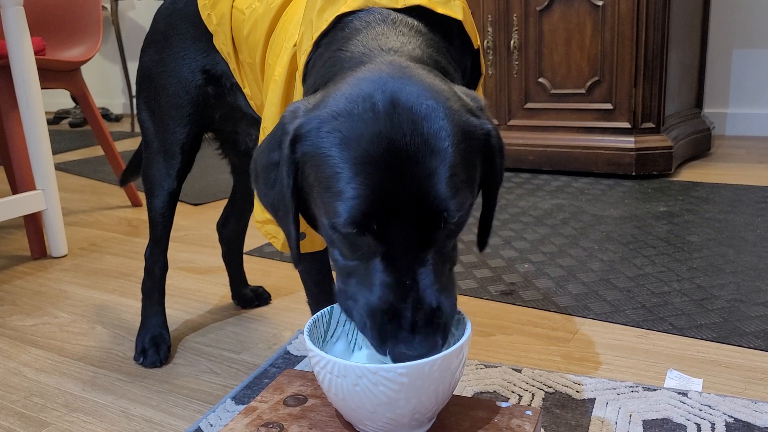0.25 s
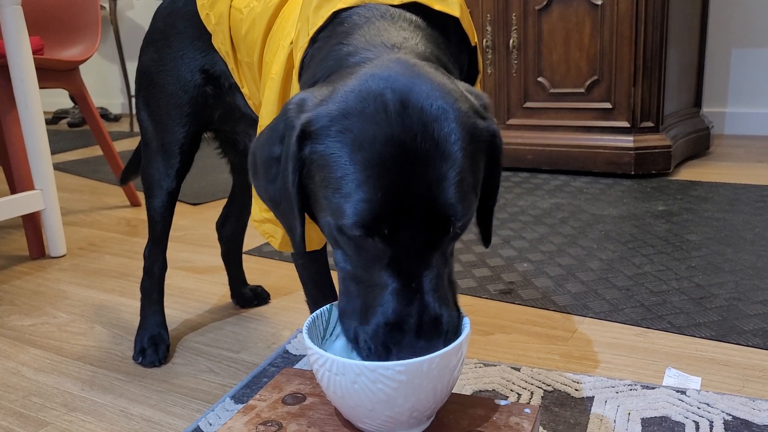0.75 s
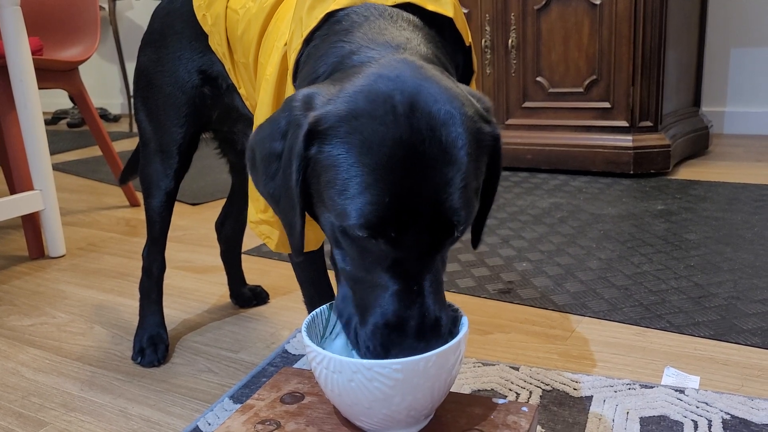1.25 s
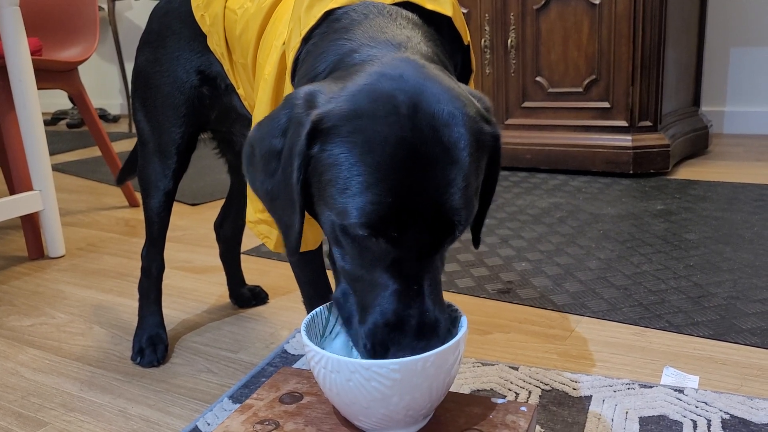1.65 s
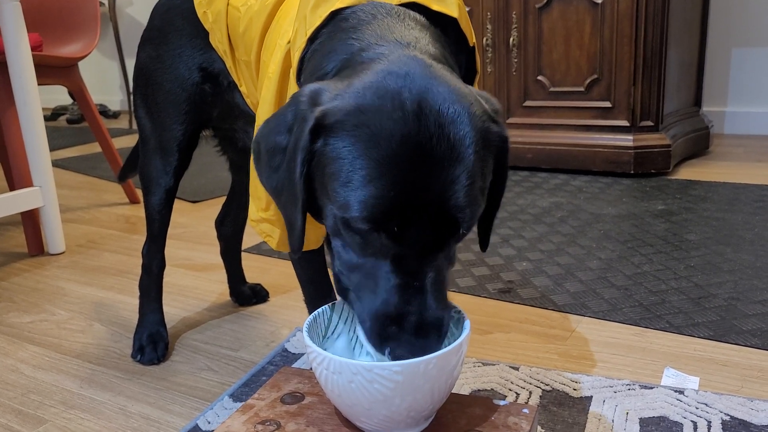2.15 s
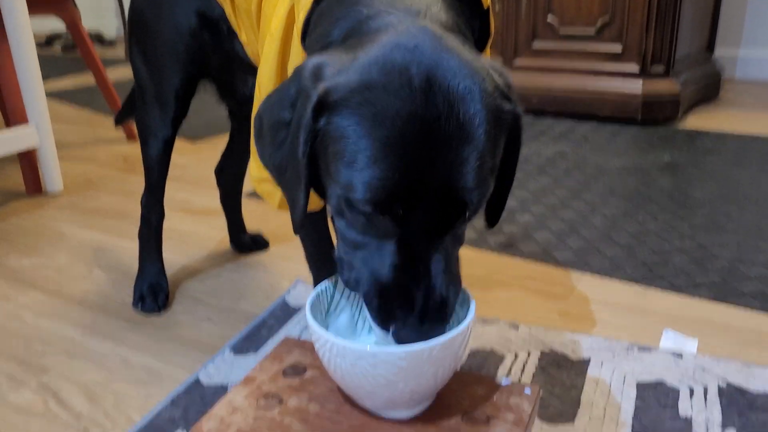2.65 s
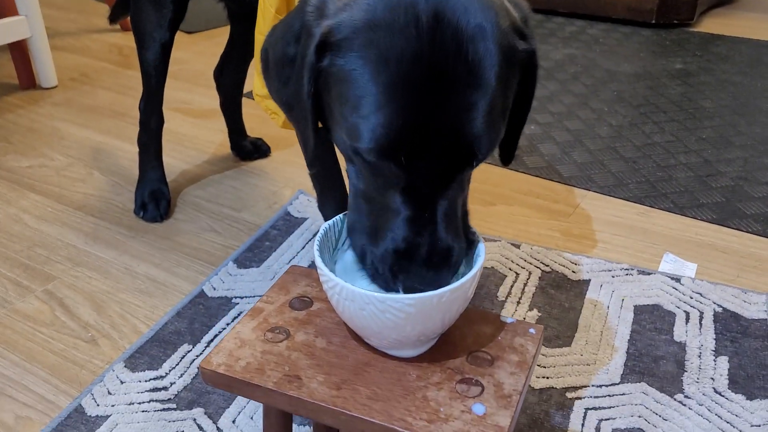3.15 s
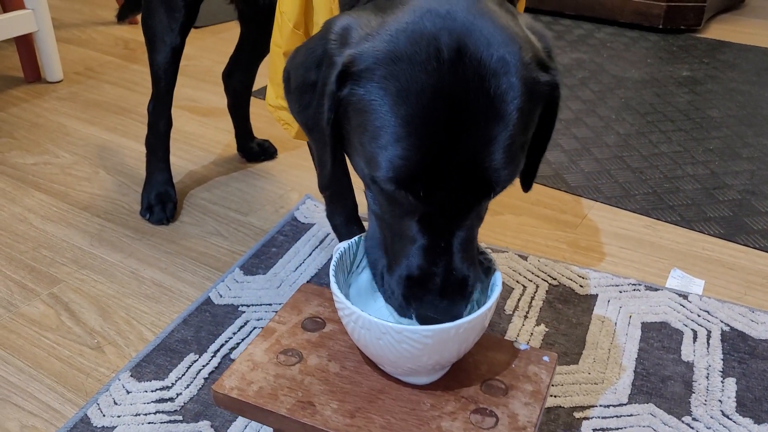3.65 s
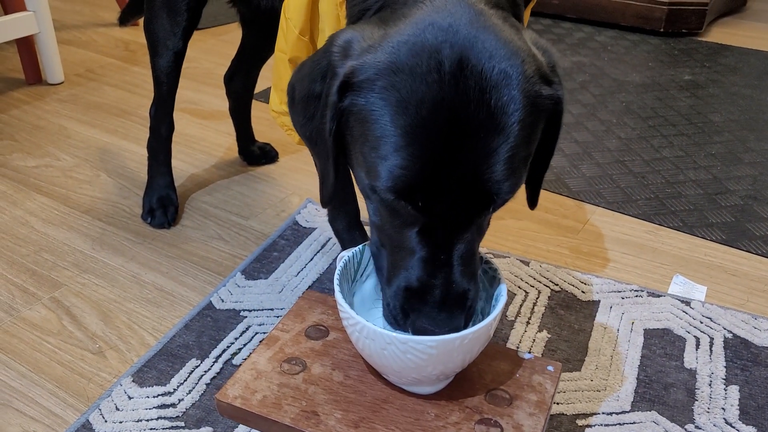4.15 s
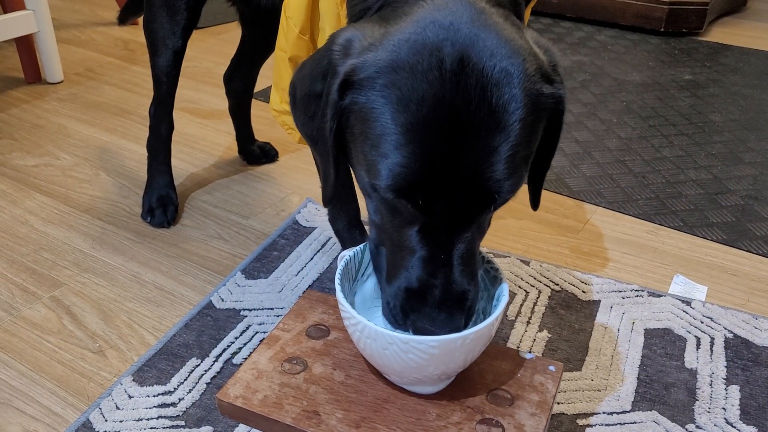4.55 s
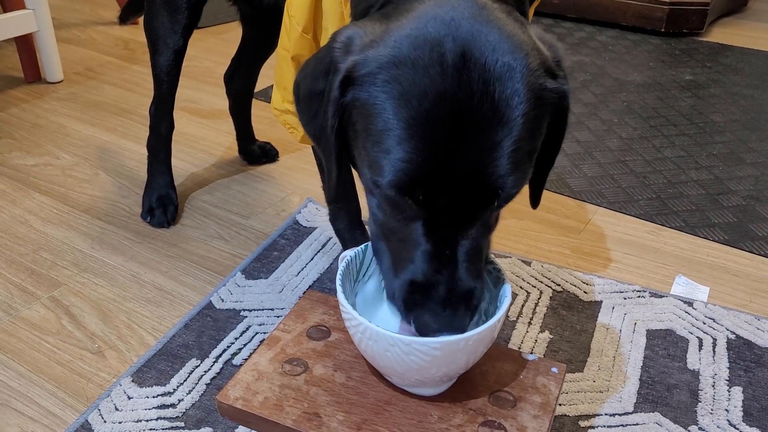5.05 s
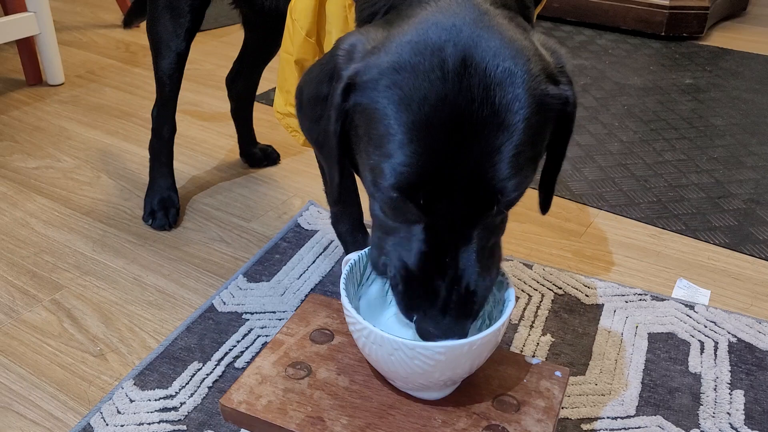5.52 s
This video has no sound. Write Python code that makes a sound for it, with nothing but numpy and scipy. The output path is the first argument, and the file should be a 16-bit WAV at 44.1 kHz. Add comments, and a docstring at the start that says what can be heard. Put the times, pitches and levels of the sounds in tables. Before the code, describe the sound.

Close stereo capture of steady, gooey lapping already under way and continuing to the end. Mid-low bowl-ringing plops alternate with bright clicking mouth smacks, with squelchy crackle, small bubbles and saliva ticks between them. A short hard bump on the microphone side, right of centre, comes just after two seconds with soft rubs. The room is small, lively and quiet, with a barely audible low hum.

```python
"""A small, hard-floored room: a dog laps a creamy treat from a ceramic bowl, about 2.5 laps a second.
Each lap is pitched plops that ring the air in the bowl, with squelches and thuds of filtered snaps,
then a bright wet smack: a click rung in the mouth plus fizz. Bubbles, drips and saliva ticks lie between.
Direct sound and a decaying-noise room reach two microphones; rubs and knocks on a hand-held camera are
strongest on the right. Quiet air and a low hum lie below."""
import sys
import numpy as np
from scipy import signal
from scipy.fft import rfft, irfft
from scipy.io import wavfile
from scipy.ndimage import uniform_filter1d

SR = 44100
rng = np.random.default_rng(int(sys.argv[2]) if len(sys.argv) > 2 else 0)


def master(y):
    """Save y as 16-bit WAV."""
    cut = np.clip(np.atleast_2d(y).T, -1, 1)
    pcm = np.round(cut * 32767)  # scale
    wavfile.write(sys.argv[1], SR, pcm.astype(np.int16))


N = 254898
SIZE = 2048  # burst buffer [samples]
T = np.arange(SIZE) / SR
HZ = np.fft.rfftfreq(SIZE, 1 / SR)
LEAD = T[SIZE // 4]  # burst centre in its buffer [s]
EDGE_HZ = 16300


def amp(db):
    """Decibels to gain."""
    return 10 ** (np.asarray(db) / 20)


def read(points, hz):
    """Interpolates a table on a log-frequency axis."""
    f, value = np.transpose(points)
    return np.interp(np.log(hz + 1), np.log(f + 1), value)


def at_times(points):
    """Interpolates a table of times over the scene."""
    return np.interp(np.arange(N) / SR, *np.transpose(points))


def evened(x):
    """Scales to rms 1."""
    return x / np.sqrt(np.mean(x ** 2) + 1e-20)


def unit(x):
    """Scales a short burst to the energy of 10 ms at rms 1."""
    return x * np.sqrt(.01 * SR / (np.sum(x ** 2) + 1e-20))


def add(mix, s, sound):
    """Mixes a sound in, starting at time s."""
    start = round(s * SR)
    sound = sound[max(-start, 0):]
    part = mix[max(start, 0):][:len(sound)]
    part += sound[:len(part)]


def causal(db):
    """Minimum-phase response with these gains: it rings only after the blow."""
    log_gain = np.log(amp(np.r_[db, db[-2:0:-1]]))
    return np.exp(np.conj(signal.hilbert(log_gain)))[:len(db)]


def resonance(hz, width_hz):
    """Response of one damped mode."""
    return 1j * HZ * width_hz / (hz ** 2 - HZ ** 2 + 1j * HZ * width_hz)


def random_sizes(spread_db, limit, count):
    """Exponentially scattered levels of snaps, as gains."""
    return amp(spread_db * np.minimum(rng.exponential(1, count), limit))


def tear(length, per_s, spread_db, creep=0.23, creep_length=6.4):
    """Spectrum of a run of tiny snaps: dense around one sure snap, with a weaker, longer skirt."""
    u = (T - LEAD) / max(length, 1 / SR)
    swell = np.exp(-2 * u ** 2) + creep * np.exp(-2 * (u / creep_length) ** 2)
    snaps = (rng.random(SIZE) < per_s / SR) * rng.choice([-1, 1], SIZE)
    run = swell * snaps * random_sizes(spread_db, 3, SIZE)
    run[SIZE // 4] += 1
    return rfft(run)


def noise(colour):
    """Steady coloured noise of rms 1."""
    gain = amp(read(colour, np.fft.rfftfreq(N, 1 / SR)))
    return evened(irfft(rfft(rng.standard_normal(N)) * gain, N))


# spectrum of the quiet room: (frequency [Hz], level [dB])
AIR_SPECTRUM = [(20, -8), (45, 0), (70, 5.5), (100, 7.5), (170, -21), (300, -23), (480, -22), (740, 0),
                (1300, -19.5), (3000, -9), (6000, -35), (12000, -32.5), (16000, -46)]


def background(floor_db=-67, hum_db=-74, hum_hz=69):
    """Quiet house air, partly shared by both sides, and the low hum of an appliance."""
    shared = noise(AIR_SPECTRUM)
    air = np.array([0.73 * shared + 0.68 * noise(AIR_SPECTRUM) for _ in range(2)])
    hum = np.sin(2 * np.pi * hum_hz * np.arange(N) / SR)
    return amp(floor_db) * air + amp(hum_db) * hum


# rubbing fingers, spectrum: (frequency [Hz], level [dB])
RUB_SPECTRUM = [(25, -20), (70, 2.5), (150, -4), (310, 2.5), (500, -12), (1200, -11), (5000, -39)]
# fingers shifting on the camera, right side: (time [s], level [dB])
HANDLING = [(0, -79), (2.15, -66), (2.298, -46.5), (2.355, -58), (2.405, -50), (2.55, -60), (3.1, -67),
            (3.35, -55), (3.7, -72), (5.78, -70.5)]
# knocks on the camera, right side:
# (time [s], thump level [dB], thump pitch [Hz], click level [dB], thump decay [s])
KNOCKS = [(2.245, -31, 140, -70, .007), (2.2998, -12, 214, -9.5, .0026), (2.408, -28, 213, -70, .005),
          (2.428, -31, 125, -75, .006)]


def camera(click_s=0.00021, grit=.15, grit_s=.00024, left_db=-22, rub_left_db=-4):
    """Fingers rub the case (coloured noise) and knock it near the right microphone (decaying sines, clicks)."""
    rub = noise(RUB_SPECTRUM) * amp(at_times(HANDLING))
    blows = np.zeros(N)
    for s, thump_db, hz, click_db, ring_s in KNOCKS:
        thump = np.sin(2 * np.pi * hz * T) * np.exp(-T / ring_s)
        grains = np.diff(rng.standard_normal(SIZE + 1)) * np.exp(-T / grit_s)
        tick = -np.exp(-T / click_s) + grit * grains
        add(blows, s, amp(thump_db) * thump + amp(click_db) * tick)
    left = amp(rub_left_db) * rub + amp(left_db) * blows
    return np.array([left, rub + blows])


def bubble(hz, ring_s, rise):
    """A bubble swells quickly, then dies away while its pitch rises."""
    u = T / max(ring_s, 1 / SR)
    pitch = hz * (1 + rise * np.tanh(u / 2 - .5))
    turns = np.cumsum(pitch) / SR + rng.random()
    return u * np.exp(-u) * np.sin(2 * np.pi * turns)


# mouth cavity and fizz, spectra: (frequency [Hz], level [dB])
MOUTH_SPECTRUM = [(300, -39), (1200, -16.5), (2000, 3.5), (3000, 1.5), (4200, -3), (5300, -3.5),
                  (6500, -11.5), (10000, -48.5)]
FIZZ_SPECTRUM = [(2000, -33.5), (5000, 7.5), (6800, 1.5), (8200, 5.5), (10000, 0), (12500, -3.5),
                 (14300, -0.5), (15600, 4.5), (16500, -4), (18000, -19)]
# brightness of the fizz: (time [s], centre of its resonance before scatter [Hz])
FIZZ_BRIGHTNESS = [(.25, 10900), (.65, 14200), (1.2, 14000), (1.8, 8900), (3.0, 11600), (3.6, 8500),
                   (4.75, 8500), (5.2, 14100)]
FILM_HZ, THREAD_LENGTH_S = 2920, 0.0016  # film between tongue and cream; one thread of it


def film(s, click_db, hz, fizz_db, length, width_hz=1100, broad=0.22, tint_gain=1.7, tint_width_hz=2200):
    """A wet film snaps: a fizz straight out, and a bright click rung in the mouth."""
    mouth = causal(read(MOUTH_SPECTRUM, HZ)) * (resonance(hz, width_hz) + broad)
    click = unit(irfft(tear(length, per_s=2600, spread_db=6.0) * mouth))
    # a scattered resonance colours each fizz
    tint_hz = np.interp(s, *np.transpose(FIZZ_BRIGHTNESS)) * rng.uniform(0.69, 1.27)
    tint = 1 + tint_gain * resonance(tint_hz, tint_width_hz)
    spray = tear(length, per_s=3100, spread_db=7.5) * causal(read(FIZZ_SPECTRUM, HZ)) * tint
    return amp(click_db) * click + amp(fizz_db) * unit(irfft(spray))


# squelch spectrum: (frequency [Hz], level [dB])
SQUELCH_SPECTRUM = [(150, -28.5), (350, -16), (520, -1.5), (950, 2.5), (1200, -4.5), (1700, -8.5),
                    (2300, -16), (3500, -17), (7000, -46)]


def froth(length, count=6):
    """A handful of small bubbles, each with its own pitch, breaking at nearly the same moment."""
    out = np.zeros(SIZE)
    for size, when in rng.random((count, 2)):
        hz = 420 * (2600 / 420) ** size
        pop = unit(bubble(hz, ring_s=1.32 / hz, rise=0.09))
        add(out, LEAD + length * (when - .6), amp(read(SQUELCH_SPECTRUM, hz)) * pop)
    return unit(out)


# thud spectrum: (frequency [Hz], level [dB])
THUD_SPECTRUM = [(40, -15.5), (110, -9), (260, 2.5), (400, -5), (600, -11), (1200, -35.5)]


def plop(db, hz, length, thud_db, squelch_db, ring_db=-1, froth_db=-1, snap_db=-4,
         width_hz=380, glide=0.065, stretch=0.74):
    """A pocket opens with a squelch and a soft thud, and rings the air between muzzle and bowl."""
    u = (T - LEAD) / max(length * stretch, 1 / SR)
    # the pitch slides a little, up or down
    turns = np.cumsum(hz * (1 + glide * rng.normal() * np.tanh(u))) / SR + rng.random()
    puff = np.exp(-2 * u ** 2) * np.sin(2 * np.pi * turns)
    ring = unit(irfft(rfft(puff) * resonance(hz, width_hz)))
    snaps = unit(irfft(tear(length, per_s=1500, spread_db=6.5) * causal(read(SQUELCH_SPECTRUM, HZ))))
    squelch = amp(snap_db) * snaps + amp(froth_db) * froth(length)
    thud = unit(irfft(tear(length, per_s=1300, spread_db=2.5) * causal(read(THUD_SPECTRUM, HZ))))
    return amp(db) * (amp(ring_db) * ring + amp(squelch_db) * squelch + amp(thud_db) * thud)


def light_plop(db, bowl_hz=818.4, length=0.00463, thud_db=-17.5, squelch_db=-5, scatter=0.037):
    """A light plop with a slightly scattered bowl pitch."""
    return plop(db, bowl_hz * (1 + scatter * rng.normal()), length, thud_db, squelch_db)


# mouth closings: (smack time [s], click level [dB], mouth resonance [Hz], fizz level [dB], length [s],
#  puff time [s], puff level [dB], lip touch time [s], touch click level [dB])
SMACKS = [(.0095, -39.5, 3600, -54, 0.0039, .006, -40, .002, -55),
          (.398, -40, 3900, -50.5, .0016, .391, -42, .389, -43),
          (.766, -34, 3700, -49.5, .0018, .758, -36.5, .76, -37),
          (1.2047, -39.5, 2750, -55, 0.005, 1.202, -41, 1.19, -50),
          (1.567, -34.5, 3600, -60, 0.012, 1.563, -34, 1.5575, -41),
          (1.944, -45, 3500, -70, .009, 1.935, -34, 1.926, -46),
          (2.3275, -36, 2930, -54, 0.0069, 2.324, -39, 2.318, -55),
          (2.7855, -29, 3100, -49.5, .006, 2.7795, -34.5, 2.771, -43),
          (3.1643, -33, 3740, -41.5, 0.0022, 3.156, -35, 3.152, -50),
          (3.5464, -35.5, 3800, -49.5, 0.0031, 3.544, -35, 3.529, -50),
          (4.0223, -38, 3270, -44.5, 0.00089, 4.017, -35, 4.007, -45),
          (4.403, -33.5, 3450, -42, .003, 4.4, -38.5, 4.39, -47),
          (4.804, -39, 3280, -50, .0012, 4.8048, -41, 4.803, -60),
          (5.263, -36, 4200, -44, 0.0013, 5.26, -36, 5.247, -46),
          (5.649, -37.5, 3450, -45.5, .007, 5.639, -34, 5.63, -42)]
GULP_LEAD_S, GULP_HZ, GULP_DB, GULP_RING_S = .026, 274, -50, 0.0028  # pitch before scatter
LIPS_PLOP_DB, LIPS_FIZZ_DB = -7, -17  # lip touch: plop re puff, fizz re touch click


def smacks(after_s=0.012, after_db=-15, after_fizz_db=-24, after_length=0.0064,
           spit_hz=1900, spit_db=-13, spit_ring_s=.0018):
    """Around each smack: a low gulp before it, a light lip touch, a puff, a small bubble, then settling."""
    out = np.zeros(N)
    for s, click_db, hz, fizz_db, length, puff, puff_db, touch, touch_db in SMACKS:
        gulp = unit(bubble(GULP_HZ * rng.uniform(0.827, 1.14), GULP_RING_S, rise=0.044))
        add(out, s - GULP_LEAD_S, amp(GULP_DB) * gulp)
        lips = film(s, touch_db, hz, touch_db + LIPS_FIZZ_DB, THREAD_LENGTH_S)
        add(out, touch - LEAD, lips + light_plop(puff_db + LIPS_PLOP_DB))
        add(out, puff - LEAD, light_plop(puff_db))
        add(out, s - LEAD, film(s, click_db, hz, fizz_db, length))
        spit = unit(bubble(spit_hz * rng.uniform(0.86, 1.152), spit_ring_s, rise=0.087))
        add(out, s, amp(click_db + spit_db) * spit)
        settling = film(s, click_db + after_db, FILM_HZ, fizz_db + after_fizz_db, after_length)
        add(out, s + after_s - LEAD, settling)
    return out


def ticks(click_db=-68, fizz_db=-67, spread_db=4, length=.0006, before_s=.06, count=2):
    """Single threads of saliva part shortly before each smack."""
    out = np.zeros(N)
    for s, *_ in SMACKS:
        for lead, db in zip(before_s * rng.random(count), spread_db * rng.standard_normal(count)):
            add(out, s - lead - LEAD, film(s, click_db + db, FILM_HZ, fizz_db + db, length))
    return out


def stickiness(laps, per_s=420, spread_db=4, linger_s=0.039, bowl_db=-19, mouth_db=-26, fizz_db=-35):
    """Small bubbles and threads of cream burst at random, their level following the laps."""
    r = np.exp(-1 / (linger_s * SR))
    power = uniform_filter1d(laps ** 2, size=700)
    motion = np.sqrt(abs(signal.lfilter([1 - r], [1, -r], power)))
    bowl = resonance(774, 240) * causal(read(SQUELCH_SPECTRUM, HZ))
    mouth = causal(read(MOUTH_SPECTRUM, HZ))
    fizz = causal(read(FIZZ_SPECTRUM, HZ))
    out = np.zeros(N)
    for db, response in [(bowl_db, bowl), (mouth_db, mouth), (fizz_db, fizz)]:
        pops = (rng.random(N) < per_s / SR) * random_sizes(spread_db, 4, N)
        pops = pops * rng.choice([-1, 1], N)
        out += amp(db) * evened(signal.oaconvolve(pops, irfft(response))[:N])
    return out * motion


# cream dripping from the lips: (time [s], plop level [dB], click level [dB], fizz level [dB])
DRIPS = [(.153, -56, -68, -70), (1.0212, -42, -60, -78), (1.267, -49, -64, -75), (3.27, -50, -53, -72),
         (3.987, -70, -70, -58), (4.828, -46, -65, -57.5), (5.7023, -59, -46, -57)]


def drips():
    """Stray drops fall back into the bowl: a light plop and a film snap each."""
    out = np.zeros(N)
    for s, plop_db, click_db, fizz_db in DRIPS:
        snap = film(s, click_db, FILM_HZ, fizz_db, THREAD_LENGTH_S)
        add(out, s - LEAD, light_plop(plop_db) + snap)
    return out


def chirp(db, low_hz=1400, high_hz=3700, ring_s=.0016, rise=.1):
    """A tiny bubble thrown off by a small pocket."""
    return amp(db) * unit(bubble(low_hz * (high_hz / low_hz) ** rng.random(), ring_s, rise))


# tongue strokes; plop lengths are before plop()'s stretch:
# (dip time [s], dip level [dB], dip pitch [Hz], dip length [s],
#  pull time [s], pull level [dB], pull pitch [Hz], pull length [s], let-go time [s], let-go level [dB],
#  thud re plop [dB], squelch re plop [dB],
#  tear time [s], tear click level [dB], tear fizz level [dB], tear length [s])
STROKES = [(0.2352, -27.5, 744, 0.0078, .25, -27, 770, .005, .306, -47, -19, -6, .243, -47, -50, .006),
           (.605, -28, 765, 0.0096, .635, -34.5, 728, 0.0072, .648, -40, -12, -5.5, .6045, -49, -47, .0025),
           (1.04, -30.5, 894, 0.0082, 1.068, -30.5, 735, 0.0047, 1.11, -33.5, -11, -0.5, 1.042, -40.5, -45, .0035),
           (1.4125, -29.5, 790, .0055, 1.438, -37, 714, 0.0086, 1.464, -32.5, -12, -3.5, 1.435, -45, -57, .002),
           (1.7785, -33.5, 889, .003, 1.795, -26, 815, .018, 1.8294, -25, -10.5, 0, 1.786, -38, -42, .002),
           (2.162, -27, 860, .006, 2.1885, -24.5, 843, 0.01, 2.22, -50, -30, -8.5, 2.178, -46, -47, .008),
           (2.595, -35.5, 928, 0.0018, 2.636, -33.5, 885, 0.011, 2.68, -36.5, -16.5, -2.5, 2.6345, -40.5, -42, .011),
           (3.001, -30, 820, 0.0081, 3.014, -28, 844, 0.0064, 3.057, -41.5, -22.5, -4, 3.007, -42, -38, .008),
           (3.39, -31.5, 860, 0.011, 3.4044, -30, 765, 0.0031, 3.438, -37.5, -18, -7, 3.39, -43, -43.5, .005),
           (3.831, -40, 827, .008, 3.875, -29.5, 810, 0.0039, 3.915, -37.5, -24, -8, 3.872, -44.5, -42, .005),
           (4.243, -34, 805, 0.011, 4.252, -31.5, 838, .007, 4.2996, -39, -19.5, -3, 4.2513, -36.5, -43, .003),
           (4.64, -35.5, 798, 0.0049, 4.6533, -30, 828, 0.0065, 4.706, -35, -20.5, -9, 4.6435, -46, -45, .0056),
           (5.089, -36, 636, 0.0022, 5.097, -28.5, 688, .006, 5.181, -43.5, -17, -10.5, 5.1, -45, -57.5, .004),
           (5.483, -27, 593, 0.0044, 5.4958, -24.5, 777, 0.0094, 5.539, -35.5, -21.5, -9.5, 5.4885, -36.5, -34.5, .005)]
DIP_CLICK_DB, DIP_FIZZ_DB = -15, -32  # re dip plop
PULL_CLICK_DB, PULL_FIZZ_DB = -49, -60
LET_GO_CLICK_DB, LET_GO_FIZZ_DB = -49, -60
LET_GO_PITCH, LET_GO_LENGTH_S = .95, .0028  # pitch ratio to the pull; length before stretch
STRETCH_FIZZ_DB = -20  # re tear fizz


def tongue(small_db=-13, fade_db=-14, chirp_db=-2, stretch_s=.008, stretch_db=-11, stretch_length=.007,
           small_length=0.005056, scatter=0.071, reach=.8, count=3):
    """Each stroke plops at dip, pull and let-go, tears one film, and opens small pockets on the way."""
    out = np.zeros(N)
    for (dip, dip_db, dip_hz, dip_length, pull, pull_db, pull_hz, pull_length, let_go, let_go_db,
         thud_db, squelch_db, torn, click_db, fizz_db, tear_length) in STROKES:
        let_go_hz = pull_hz * LET_GO_PITCH
        stages = [(dip, dip_db, dip_hz, dip_length, dip_db + DIP_CLICK_DB, dip_db + DIP_FIZZ_DB),
                  (pull, pull_db, pull_hz, pull_length, PULL_CLICK_DB, PULL_FIZZ_DB),
                  (let_go, let_go_db, let_go_hz, LET_GO_LENGTH_S, LET_GO_CLICK_DB, LET_GO_FIZZ_DB)]
        for s, db, hz, length, thread_db, spray_db in stages:
            thread = film(s, thread_db, FILM_HZ, spray_db, THREAD_LENGTH_S)
            add(out, s - LEAD, plop(db, hz, length, thud_db, squelch_db) + thread)
        add(out, torn - LEAD, film(torn, click_db, FILM_HZ, fizz_db, tear_length))
        # the film crackles as it stretches, just before it tears
        crackle = film(torn, click_db + stretch_db, FILM_HZ, fizz_db + STRETCH_FIZZ_DB, stretch_length)
        add(out, torn - stretch_s - LEAD, crackle)
        for k in range(count):
            s = dip + (let_go - dip) * reach * (k + rng.random()) / count
            db = small_db + np.interp(s, [dip, pull, let_go], [dip_db, pull_db, pull_db + fade_db])
            hz = pull_hz * (1 + scatter * rng.normal())
            add(out, s + small_length - LEAD, plop(db, hz, small_length, thud_db, squelch_db))
            add(out, s + small_length, chirp(db + squelch_db + chirp_db))
    return out


# large bubbles: (time [s], level over 10 ms before trim_db [dB], pitch [Hz])
BUBBLES = [(.605, -36, 1560), (1.065, -31, 302), (1.409, -42, 1860), (1.436, -35, 302), (1.775, -37, 1385),
           (1.829, -34.5, 2074), (1.841, -33, 1306), (2.635, -35.5, 1545), (3.39, -37.5, 1670),
           (3.392, -39.5, 1216), (3.87, -38.5, 1450)]


def bubbles(ring_s=0.00234, rise=0.088, trim_db=-2):
    """Single bubbles ring at their own pitch, the big, low ones longer."""
    out = np.zeros(N)
    for s, db, hz in BUBBLES:
        ring = unit(bubble(hz, ring_s * (1000 / hz) ** 0.22, rise))
        add(out, s - ring_s / 2, amp(db + trim_db) * ring)
    return out


# direct sound at each microphone: (frequency [Hz], level [dB])
NEAR_LEFT = [(200, -6.5), (800, 1.5), (1400, 0), (2500, -1.5), (3500, -9.5), (5000, -14.5), (7000, 0),
             (9500, -0.5), (15000, -8)]
NEAR_RIGHT = [(200, -6), (800, 1.5), (1400, -6.5), (2200, 2), (3200, 3.5), (5000, 4.5), (7000, 3),
              (9500, -13), (15000, -11)]
# echoes off the glazed bowl wall: (delay to left microphone [s], delay to right microphone [s])
WALLS = [(.00043, 0.00059), (.00097, 0.00069), (.00171, 0.00134), (.0029, .0034)]


def direct(x, right_late_s=0.0001, wall_db=-12, wall_hz=1500):
    """The way to each microphone; the wall of the bowl adds a few quick treble echoes."""
    out = []
    treble = HZ ** 2 / (HZ ** 2 + wall_hz ** 2)
    for colour, late, delays in zip([NEAR_LEFT, NEAR_RIGHT], [0, right_late_s], np.transpose(WALLS)):
        walls = np.exp(-2j * np.pi * HZ[:, None] * delays).sum(1) * treble
        path = (1 + amp(wall_db) * walls) * np.exp(-2j * np.pi * HZ * (late + LEAD))
        response = irfft(path * amp(read(colour, HZ)))
        out.append(signal.oaconvolve(x, response)[SIZE // 4:][:N])
    return np.array(out)


# treble the muzzle throws past the camera into the room: (time [s], level [dB])
SPILL = [(.4, 4.5), (1.2, 3), (2.2, 1), (3.001, 1), (4.7, -0.5), (5.501, 2.5)]


def spilled(x, treble_hz=6500):
    """What the bowl sends into the room, its treble varying over time."""
    hz = np.fft.rfftfreq(N, 1 / SR)
    treble = irfft(rfft(x) * hz ** 4 / (hz ** 4 + treble_hz ** 4), N)
    return x + treble * (amp(at_times(SPILL)) - 1)


# time to decay by 60 dB: (frequency [Hz], time [s])
ROOM_T60 = [(120, .5), (300, .5), (750, 0.25), (1700, 0.45), (3500, 0.54), (7000, 0.5), (14000, 0.26)]
# room strength at each microphone: (frequency [Hz], level [dB])
ROOM_LEFT = [(100, -2), (300, -1.5), (750, -8.5), (1400, -1.5), (2700, -11), (5000, -9), (9000, -8.5),
             (15000, -9.5)]
ROOM_RIGHT = [(100, -5), (300, -1), (750, -6), (1400, -1), (3000, -2), (5000, -4.5), (9000, -10),
              (15000, -10)]


def reflections(first_s=0.00066, alike_hz=950):
    """Dense noise reflections, each band dying at its own speed, alike at both microphones in the bass."""
    hz, t, z = signal.stft(rng.standard_normal((2, SR)), SR, nperseg=256)
    alike = (.9 / (1 + (hz / alike_hz) ** 4))[:, None]
    z[1] = alike * z[0] + np.sqrt(1 - alike ** 2) * z[1]
    t60 = read(ROOM_T60, hz)[:, None]
    z *= np.exp(-np.log(1000) * t / t60) * np.sqrt(2 * np.log(1000) / (t60 * SR))
    z *= amp([read(ROOM_LEFT, hz), read(ROOM_RIGHT, hz)])[:, :, None]
    tail = signal.istft(z, SR, nperseg=256)[1]
    return tail * np.clip(np.arange(tail.shape[1]) / (first_s * SR) - .5, 0, 1)


def room(x, wet_db=-1, fade_hz=3.7, count=3):
    """Several diffuse room tails fade in and out in turn, so no steady bands ring through."""
    out = np.zeros((2, N))
    for k in range(count):
        share = np.sqrt(2 / count) * np.cos(2 * np.pi * (fade_hz * np.arange(N) / SR + k / count))
        out += signal.oaconvolve((x * share)[None], reflections(), axes=1)[:, :N]
    return amp(wet_db) * out


def scene():
    """The lapping, near and through the room, with camera handling and background."""
    laps = tongue() + smacks() + ticks() + drips() + bubbles()
    laps = laps + stickiness(laps)
    return direct(laps) + room(spilled(laps)) + camera() + background()


def record(dry):
    """Low-pass band limit at EDGE_HZ."""
    low_pass = signal.firwin(401, EDGE_HZ, window=("kaiser", 9), fs=SR)
    return signal.oaconvolve(dry, low_pass[None], "same")


dry = scene()
out = record(dry)
master(out)
```